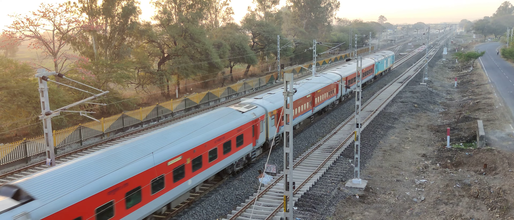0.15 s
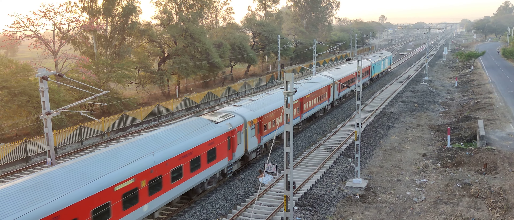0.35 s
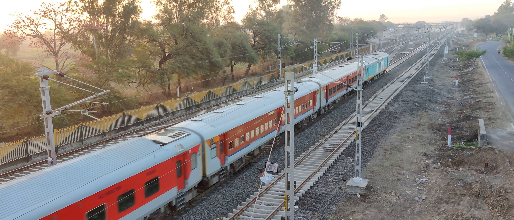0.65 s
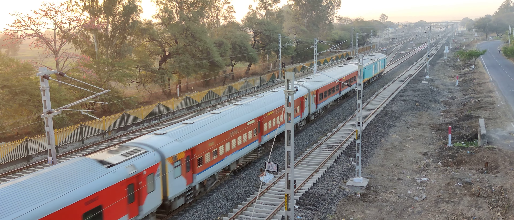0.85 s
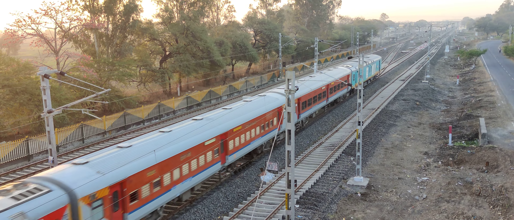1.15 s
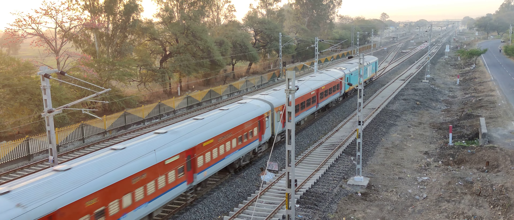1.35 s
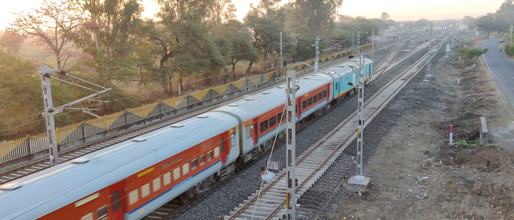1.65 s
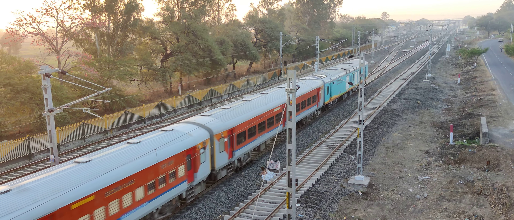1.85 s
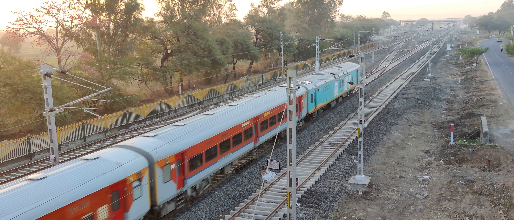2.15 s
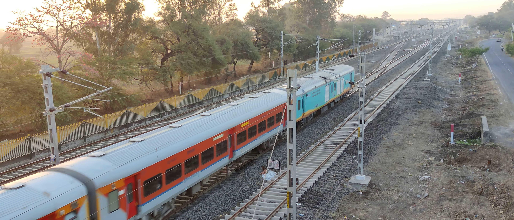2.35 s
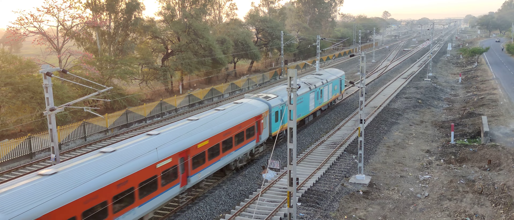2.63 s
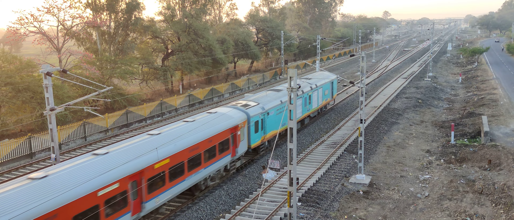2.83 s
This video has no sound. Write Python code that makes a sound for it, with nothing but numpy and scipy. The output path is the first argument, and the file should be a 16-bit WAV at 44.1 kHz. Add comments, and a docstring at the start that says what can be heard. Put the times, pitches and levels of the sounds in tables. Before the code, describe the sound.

Continuous rolling roar of a passing train fills the open air, already present at the start and unbroken to the end. Wheels clack and ping over rail joints, sleepers thud softly, heard from above on a small stereo microphone.

```python
"""A passenger train rolls past below a footbridge, its wheels roaring and hissing on the rails over rumbling
ground and humming sleepers: noises coloured layer by layer, with flickering levels. Wheels clack over rail joints,
some fainter than others: noise bursts through the wheel's resonances, with a clear ping and a rail clank.
Knocks of the track and deep thuds of the sleepers are short swelling tones. Two microphone ports colour the
treble differently."""
import sys
import numpy as np
from scipy import signal
from scipy.fft import rfft, irfft
from scipy.io import wavfile
from scipy.ndimage import uniform_filter1d

SR = 44100
rng = np.random.default_rng(int(sys.argv[2]) if len(sys.argv) > 2 else 0)


def transcribe(signal):
    """Save signal, clipped to [-1, 1], as a 16-bit WAV file at the path in sys.argv[1]."""
    frames = np.atleast_2d(signal).T
    limited = np.clip(frames, -1, 1)
    pcm = np.round(limited * 32767).astype(np.int16)
    wavfile.write(sys.argv[1], SR, pcm)


def voltage_ratio(level):
    """Linear amplitude factor for a level in decibels (scalar or array-like)."""
    return 10 ** (np.asarray(level, float) / 20)


N = 131859
F = np.fft.rfftfreq(N, 1 / SR)
T = np.arange(N) / SR
SIZZLE_HZ = 4600  # above this lies the top of the wheel sound


def level(x):
    """Scale to rms 1."""
    return x / np.sqrt(np.mean(x ** 2))


def over_frequency(table, col):
    """A table column read along log frequency."""
    table = np.array(table)
    return np.interp(np.log(F + 1), np.log(table[:, 0]), table[:, col])


def over_time(table, col):
    """A table column drawn as straight lines through time."""
    table = np.array(table)
    return np.interp(T, table[:, 0], table[:, col])


def noise(colour=None):
    """Two unrelated noises of one colour, rms 1; white if no colour is given."""
    white = rng.standard_normal((2, N))
    if colour is None:
        return white
    return level(irfft(rfft(white) * voltage_ratio(over_frequency(colour, 1)), N))


def walk(rate_hz):
    """A random flicker: values held for 1 / rate_hz, then slewed twice; spread near 1."""
    hold = int(SR / rate_hz)
    steps = np.repeat(rng.standard_normal(N // 40), hold)[:N]
    return 1.3 * uniform_filter1d(uniform_filter1d(steps, hold), hold)


def ring(x, modes):
    """Steep resonances of a wheel, neighbours in opposite sign; white noise keeps its rms."""
    response = 0
    for k, (hz, width_hz, level_db, _) in enumerate(modes):
        detune = (F ** 2 - hz ** 2) / (F * width_hz + 1e-9)
        response = response + (-1) ** k * voltage_ratio(level_db) / (1 + 1j * detune) ** 2
    return irfft(rfft(x) * response / np.sqrt(np.mean(abs(response) ** 2)), N)


def shape(peak_s, rise_s, fall_s):
    """Exponential swell up to peak_s, exponential fall after it."""
    return np.exp(np.where(T < peak_s, (T - peak_s) / rise_s, (peak_s - T) / fall_s))


def bumps(rows, rise_s, fall_s):
    """A few cycles at one pitch swell and die for each row, fullest about one rise after its time."""
    out = np.zeros(N)
    for start_s, level_db, pitch_hz in rows:
        swell = uniform_filter1d(shape(start_s + rise_s, rise_s, fall_s), int(rise_s * SR))  # rounds the peak
        for phase in rng.uniform(0, 2 * np.pi, (1, 1)):
            out = out + voltage_ratio(level_db) * swell * np.sin(2 * np.pi * pitch_hz * T + phase)
    return out


def wide_bumps(rows, rise_s, fall_s):
    """The same bumps on two channels, each with its own phases."""
    return np.array([bumps(rows, rise_s, fall_s) for _ in range(2)])


# rolling levels: start_s [s], ground_db [dB], sleeper_db [dB], drone_db [dB], roar_db [dB]
ROLLING_LEVELS = [(0, -31, -26.5, -26.5, -32.5), (.35, -26, -27.5, -25, -28.5), (.9, -29, -25, -25, -30),
                  (1.3, -26.5, -23.5, -23, -28.5), (1.9, -24.5, -20, -20.5, -30),
                  (2.45, -26.5, -24, -25.5, -31), (2.99, -25, -24.5, -26.5, -33)]
# wheel hiss, loudest and brightest while bogies are near: start_s [s], level_db [dB],
# top_db [dB, lift of the part above SIZZLE_HZ]
BOGIES_NEAR = [(0, -39, -13), (.168, -43.5, -11), (.176, -45.5, 4), (.5, -36, 5.5), (.62, -41, -17),
               (.9, -38, 5.5), (1.38, -40.5, -19), (1.43, -37.5, 5.5), (1.85, -41, -3), (2.12, -36, 5),
               (2.35, -38, -3.5), (2.648, -39.5, -8), (2.656, -37.5, 4), (2.99, -44.5, -5.5)]
# tone colours of the rumbling ground, humming sleepers, droning rail, roaring rail and hissing wheel:
# pitch_hz [Hz], density_db [relative dB per Hz]
GROUND_COLOUR = [(12, -15.5), (20, 6), (32, 2), (48, -1), (63, 9.5), (103, 4), (130, 2), (170, -35.5)]
SLEEPER_COLOUR = [(100, -24), (140, 1), (215, 6), (300, -4), (400, -43.5)]
DRONE_COLOUR = [(250, -67), (329, -7.5), (420, 0), (520, -1.5), (620, -7), (800, -50.5)]
ROAR_COLOUR = [(450, -57), (620, -2.5), (770, 5), (864, -2), (930, -0.5), (1050, -4), (1170, -14.5),
               (1500, -26.5)]
HISS_COLOUR = [(1000, -9), (1250, 13.5), (1500, 6.5), (2300, 5.5), (3500, -4.5), (5100, -14), (7000, -7)]
# wheel resonances, lowest first: pitch_hz [Hz], width_hz [Hz], level_db [relative dB],
# rattle_db [dB, rattle against the blow]
WHEEL_MODES = [(1853, 200, 2.5, -6.5), (2510, 93, -5, -2), (2750, 264, -6, -3), (3150, 177, -4, -4),
               (3980, 380, -9, -2.5), (4656, 140, -10, -8), (5610, 290, -12, -20), (6450, 450, -10, -11)]


def rolling():
    """Rough wheels on rough rails shake ground, sleepers, rail and wheel; all but the ground flicker."""
    ground_db, sleeper_db, drone_db, roar_db = (over_time(ROLLING_LEVELS, k) for k in range(1, 5))
    hiss_db, top_db = (over_time(BOGIES_NEAR, k) for k in (1, 2))
    grit = walk(59.97)  # shared by roar and hiss

    ground = voltage_ratio(ground_db) * noise(GROUND_COLOUR)
    sleepers = voltage_ratio(sleeper_db + 1.14 * walk(36.74)) * noise(SLEEPER_COLOUR)
    drone = voltage_ratio(drone_db + 1.3 * walk(39.22)) * noise(DRONE_COLOUR)
    roar = voltage_ratio(roar_db + 0.74 * grit) * noise(ROAR_COLOUR)

    wheel = level(noise(HISS_COLOUR) + voltage_ratio(-1) * ring(noise(), WHEEL_MODES))
    top = irfft(rfft(wheel) / (1 + (SIZZLE_HZ / (F + 1)) ** 10), N)
    top_gain = voltage_ratio(top_db + 2.5 * walk(14))
    hiss = voltage_ratio(hiss_db + 0.29 * grit + 0.28 * walk(170)) * (wheel + (top_gain - 1) * top)
    return ground + sleepers + drone + roar + hiss


# wheels over joints: start_s [s], treble_db [dB], clank_db [dB], note_db [dB, lowest wheel note];
# each level is a drive, trimmed for its layer below
JOINT_CLACKS = [(0.2097, -26.5, -15, -17), (0.342, -29.5, -17, -23.5), (0.5404, -36.5, -28, -41.5),
                (0.6792, -31.5, -21, -24), (0.739, -40.5, -28, -32), (0.816, -28.5, -28.5, -25),
                (1.005, -42.5, -19.5, -31), (1.1548, -31.5, -29, -29), (1.2868, -37, -32.5, -32.5),
                (1.448, -30, -17.5, -22.5), (1.51, -37.5, -26.5, -37.5), (1.584, -32, -19, -23.5),
                (1.782, -42, -21, -34), (1.9177, -31.5, -16.5, -17), (2.055, -29.5, -19, -26),
                (2.2436, -36, -25.5, -43.5), (2.6895, -24.5, -13.5, -16.5), (2.823, -27, -17, -20.5)]
# colour of the rail's clank: pitch_hz [Hz], density_db [relative dB per Hz]
CLANK_COLOUR = [(500, -27.5), (680, -0.5), (1000, 0.5), (1250, -23)]


def clacks():
    """Swell, blow and rattle ring the wheel, its lowest note pings clear; the rail clanks below."""
    start_s, treble_db, clank_db, note_db = np.array(JOINT_CLACKS).T
    at = start_s[:, None]
    hold_s = 0.012  # wheel and rail grind on together after first contact
    tail = shape(at, 0.00055, 0.17)
    swell = voltage_ratio(-1.5) * shape(at, 0.047, 0.00022)

    # the blow eases through the hold, then falls fast
    grind = shape(at, 0.002, hold_s * 2) * (T < at + hold_s)
    release = np.exp(-0.5) * shape(at + hold_s, 1, 0.011) * (T >= at + hold_s)
    sharp = np.maximum(grind, release) + voltage_ratio(-9) * swell  # lower resonances swell less before the blow
    soft = shape(at + hold_s / 2, 0.018, 0.012) + swell  # the highest swell and fade more slowly
    # each blow wakes each resonance differently; the last column detunes the ping
    luck = rng.standard_normal((len(start_s), len(WHEEL_MODES) + 1))

    note_push = voltage_ratio(note_db) @ (sharp + voltage_ratio(WHEEL_MODES[0][3]) * tail)
    note = voltage_ratio(-13) * ring(note_push * noise(), WHEEL_MODES[:1])
    ping_hz = 1945 * (1 + 0.008 * luck[:, -1])
    ping = bumps(np.c_[start_s, note_db - 3, ping_hz], rise_s=0.004, fall_s=0.011)

    ringing = 0
    for k, (hz, width_hz, mode_db, rattle_db) in enumerate(WHEEL_MODES[1:]):
        blow = soft if hz > SIZZLE_HZ else sharp
        push = voltage_ratio(treble_db + 2.5 * luck[:, k]) @ (blow + voltage_ratio(rattle_db) * tail)
        push = push * voltage_ratio(2 * walk(90))  # uneven grain
        gain = voltage_ratio(-14 + mode_db) * np.sqrt(width_hz / 100)  # wider rings pass more
        ringing = ringing + gain * ring(push * noise(), [(hz, width_hz, mode_db, rattle_db)])

    broad = voltage_ratio(treble_db - 20) @ (sharp + soft + voltage_ratio(-1) * tail) * voltage_ratio(2 * walk(250))
    clank = voltage_ratio(clank_db - 6) @ (shape(at, 0.013, 0.02) + voltage_ratio(-7.5) * tail)  # roar is left after it
    return note + ping + ringing + broad * noise(HISS_COLOUR) + clank * noise(CLANK_COLOUR)


# dull knocks of the track: start_s [s], level_db [dB before the peak is rounded], pitch_hz [Hz]
TRACK_KNOCKS = [(0.533, -6.5, 483), (0.849, -11.5, 383), (1.126, -11, 415), (1.271, -4, 415),
                (1.412, -5, 420), (1.958, -8.5, 426.7), (2.109, -7, 439), (2.242, -10, 537)]


def knocks():
    """The track knocks dully: mid-pitched tones that swell and die within milliseconds."""
    return bumps(TRACK_KNOCKS, rise_s=0.0041, fall_s=0.0037)


# deep thuds of the sleepers: start_s [s], level_db [dB before the peak is rounded], pitch_hz [Hz]
SLEEPER_THUDS = [(0.049, -18, 198), (0.461, -18.5, 211.2), (1.156, -15.5, 187), (1.749, -20, 172),
                 (2.107, -17, 232.7), (2.245, -14.5, 232.5), (2.4, -23, 205.4)]


def thuds():
    """The sleepers thud: lower tones with a slower swell and a longer fall."""
    return bumps(SLEEPER_THUDS, rise_s=0.017, fall_s=0.03)


def scene():
    """The train as it reaches the right port, and a partly unrelated share of it for the left."""
    return rolling() + clacks() + wide_knocks_and_thuds()


def wide_knocks_and_thuds():
    """Knocks and thuds drawn once per channel, so that their phases differ."""
    return np.array([knocks() + thuds() for _ in range(2)])


# left port against right port: pitch_hz [Hz], level_db [dB], likeness [0-1], lead_rad [rad]
PORT_COLOURS = [(30, 0, 1, -.03), (70, -.1, 1, -.05), (140, -.7, .998, -.12), (340, 0, .985, -.18),
                (780, -1, .92, -.15), (1000, -1, .7, -.1), (1200, -4, .5, -2.9), (1430, 3, .6, -2.7),
                (1650, -1, .3, -1), (1870, -4, .86, .2), (2200, -3, .3, -1), (2500, -6, .6, -.8),
                (2750, -4, .8, -.4), (3150, 1, .65, .5), (3400, -4, .6, 3), (3800, 0, .45, 3.3),
                (4000, -6, .75, 6.3), (4250, -7, .7, 8.2), (4700, -10, .5, 9.4), (5300, -4, .4, 10.8),
                (5800, -3, .55, 11), (6150, -9, .55, 13.6), (6600, -21, .2, 13), (7000, -13, .1, 13),
                (8300, 0, .1, 12.6), (9000, 0, .4, 12.6)]
# roll-off of the microphone's top, held by the sum of both ports: pitch_hz [Hz], level_db [dB]
MICROPHONE_TOP = [(6800, -2), (7400, -13), (8200, -19.5), (8700, -40.5), (9500, -36.5), (12500, -37),
                  (13500, -40.5)]


def microphone_ports(dry):
    """The left port hears a shaded, phase-turned mix, partly unrelated to the right; the top rolls off."""
    gain, likeness = voltage_ratio(over_frequency(PORT_COLOURS, 1)), over_frequency(PORT_COLOURS, 2)
    turn = np.exp(1j * over_frequency(PORT_COLOURS, 3))
    right, other = rfft(dry)
    left = gain * (likeness * turn * right + np.sqrt(1 - likeness ** 2) * other)
    port_sum = np.sqrt(1 + gain ** 2 + 2 * gain * likeness * turn.real)
    tone = 2 * voltage_ratio(over_frequency(MICROPHONE_TOP, 1)) / port_sum
    return irfft(np.array([left, right]) * tone, N)


def band_limit(x):
    """A steep low-pass at the top of the band."""
    return signal.sosfilt(signal.butter(12, 13440, fs=SR, output="sos"), x)


def record(dry):
    """The train through both microphone ports, as finished sound."""
    mix = microphone_ports(dry)
    return band_limit(mix)


dry = scene()
out = record(dry)
transcribe(out)
```